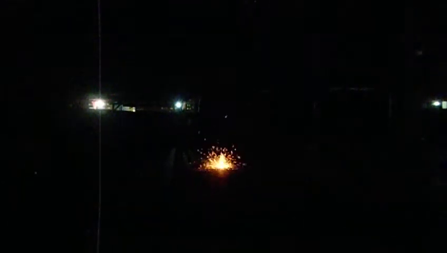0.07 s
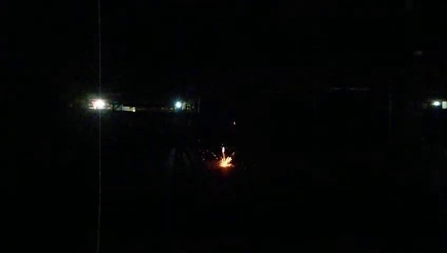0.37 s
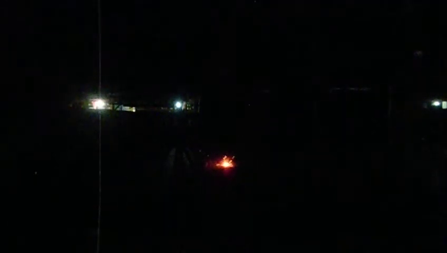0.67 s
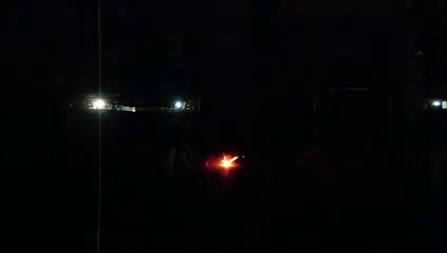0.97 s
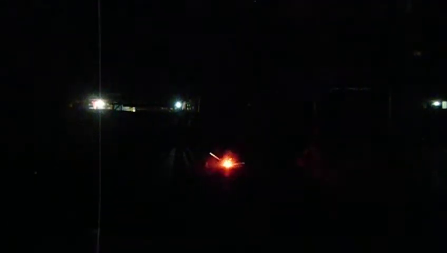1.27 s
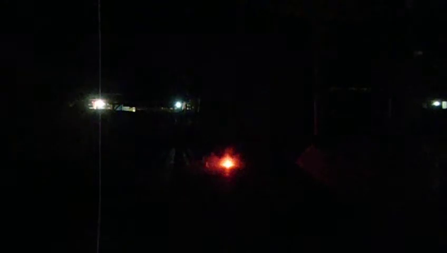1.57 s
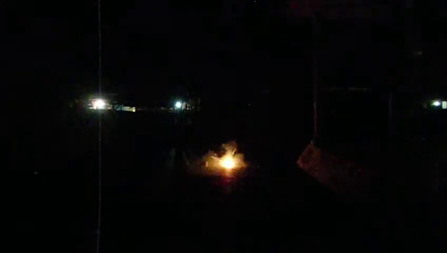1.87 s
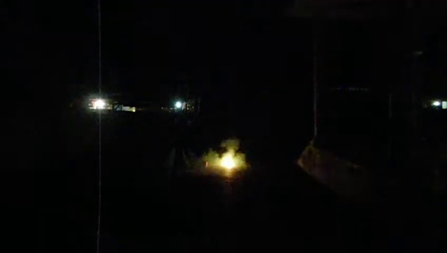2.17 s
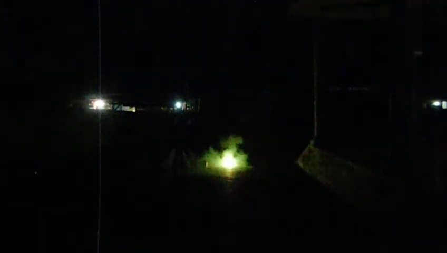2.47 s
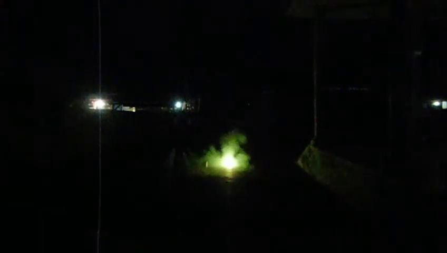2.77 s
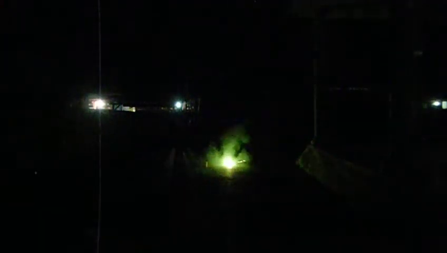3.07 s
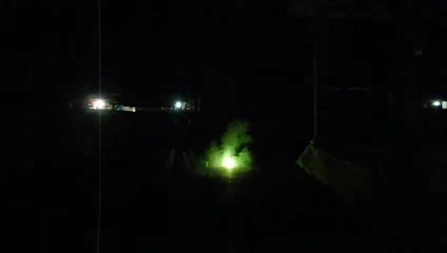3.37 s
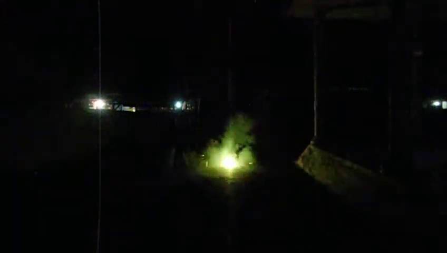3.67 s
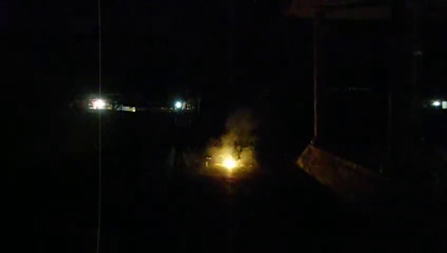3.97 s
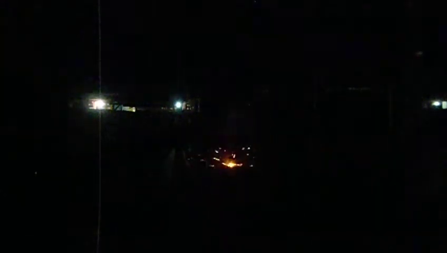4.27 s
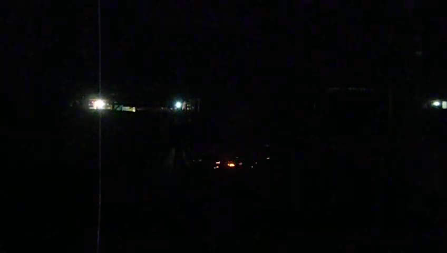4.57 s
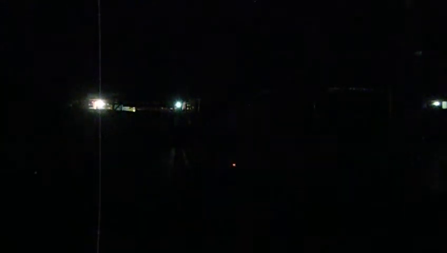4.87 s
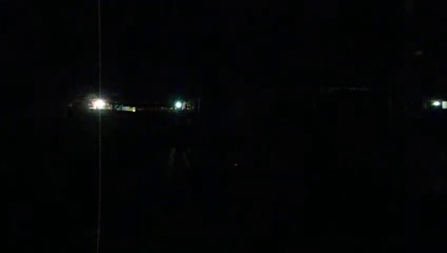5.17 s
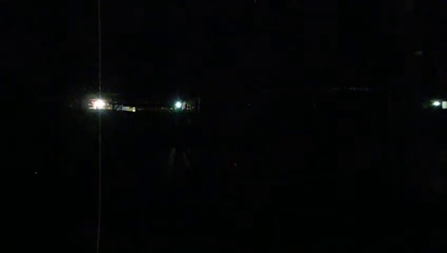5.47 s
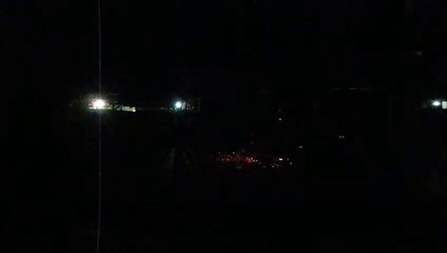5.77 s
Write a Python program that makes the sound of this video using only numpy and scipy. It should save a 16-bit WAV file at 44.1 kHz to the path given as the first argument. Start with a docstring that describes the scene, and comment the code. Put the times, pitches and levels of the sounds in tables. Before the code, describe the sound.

A spinning ground firework hisses, crackles and hums in an echoing yard, dies down, then bursts with a loud, distorted bang.

```python
"""Spinning firework in a yard

A ground firework spins in an echoing yard at night. Its jet of gas hisses and spits, and the
whirling case hums. The charge burns out, the spin slows, and the case bursts with a bang whose
echoes overload the microphone. Behind it lie a distant rumble and one faint, brief tone."""
import sys
import numpy as np
from scipy import signal
from scipy.fft import rfft, irfft, next_fast_len
from scipy.io import wavfile

SR = 44100
rng = np.random.default_rng(int(sys.argv[2]) if len(sys.argv) > 2 else 0)


def dump_mix(stems):
    """Bounce the given channels to the path in sys.argv[1] as a 16-bit WAV at rate SR."""
    frames = np.atleast_2d(stems).T  # one column per channel
    limited = np.clip(frames, -1, 1)  # hard clip at full scale
    pcm = np.round(limited * 32767).astype(np.int16)
    wavfile.write(sys.argv[1], SR, pcm)


N = 256662
TIME = np.arange(N) / SR

# strength of the jet: t/s, hiss level/dB
JET_STRENGTH = [(0, -32.5), (.06, -33.5), (.24, -41.5), (.44, -43), (.79, -38.5), (1.33, -37), (1.62, -36),
                (1.9, -35), (2.6, -33.5), (2.78, -35.5), (3.52, -37.5), (3.77, -36), (4.15, -37),
                (4.38, -46.5), (5.25, -56), (5.5, -58)]
# tone colour of the jet: f/Hz, relative level/dB
JET_SPECTRUM = [(70, -25), (170, -25), (500, -17), (850, -16.5), (1100, -20.5), (2200, -8.5), (2650, -6.5),
                (3250, -1.5), (6100, 0), (7000, -3), (8400, -4.5), (10000, -10.5), (12000, -18),
                (16000, -27)]
# pitches at which the jet rings: f/Hz, width/Hz, relative level/dB
JET_RESONANCES = [(3500, 1400, -20.5), (4740, 430, -15.5), (6050, 290, -19)]
# layers of the charge (priming sparks; red, deep red, amber, green, yellow flame; last sparks; embers):
# start t/s, bright sizzle shift/dB, low rush shift/dB, hum level at full flow/dB
CHARGE_LAYERS = [(0, -4, -11.5, -67.5), (.61, -5, -11, -52), (1.45, -7, -13, -51.5), (1.8, -10, -11, -52),
                 (2.45, -13.5, -9, -53), (3.75, -12, -8.5, -51), (4.3, -7, -10, -54.5),
                 (4.95, -15, -13.5, -65.5)]
# the jet spurts or chokes: t/s, half length/s, hiss change/dB, sizzle change/dB, rush change/dB
JET_SPURTS = [(.04, 0.094, 0, -3, 3.5), (.53, 0.028, 0, 1.5, 3.5), (1.175, 0.027, 2, 0, -3),
              (1.874, 0.023, 2.5, 2.5, -1), (2.664, 0.041, 4.5, -3, -2.5), (4.19, 0.1, -0.7, -3, 4.5),
              (4.26, .025, -6, -2, 5.5), (5.388, .05, 4.5, 2, 5)]
# loudest spits of slag (burnt lumps): t/s, relative level/dB
SLAG_SPITS = [(.0559, -10), (.0902, -11), (.113, -11), (.1974, -18), (1.4804, -24), (2.538, -19),
              (2.5682, -23), (2.647, -20), (2.977, -23), (3.9778, -25), (5.4055, -38)]
# how fast the case spins: t/s, turns per second f/Hz
SPIN_SPEED = [(0, 77.7), (.3, 79), (.75, 85), (1, 86.2), (1.15, 88.4), (1.75, 92), (1.9, 94.1),
              (2.75, 100.8), (2.9, 99.1), (3.1, 100.4), (3.3, 98.7), (3.65, 99.7), (3.9, 96.4),
              (4.05, 98.2), (4.2, 95.3), (5, 82.4), (5.4, 74)]
# resonances that the hum's overtones glide through: f/Hz, relative level/dB
BUZZ_RESONANCES = [(230, 13), (250, 11.5), (272, -2.5), (300, 2), (340, 6.5), (370, -8), (400, 0),
                   (450, -6.5), (535, 4), (575, -2), (700, -4.5), (820, -12), (850, 2), (880, 0),
                   (920, -20), (950, -24), (1120, -2), (2000, -44)]
# tone colour of the bang's echoes: f/Hz, relative level/dB
BANG_SPECTRUM = [(30, -7.5), (100, -8.5), (250, -9), (700, -2.5), (1200, -7.5), (2500, -11), (5000, -15),
                 (8000, -19), (15000, -39.5)]
# sound bouncing off the ground and near walls: delay t/s, relative level/dB
NEAR_ECHOES = [(.00066, -17), (.00907, -10.5), (.0117, -11.5), (.0208, -15)]
# tone colour of the night: f/Hz, relative level/dB
NIGHT_SPECTRUM = [(15, 6.5), (45, -3), (65, 0), (90, 1.5), (120, -3.5), (165, -4), (225, -9.5), (310, -14),
                  (600, -14.5), (2000, -28), (15000, -41)]
# a far tone swells and fades: t/s, level/dB
FAR_TONE_LEVEL = [(5.24, -100), (5.33, -70.5), (5.44, -67), (5.52, -85)]


def jet(angle, hiss_db, sizzle_db, rush_db, rush_gain_db=18, sizzle_gain_db=11, flutter_db=.72):
    """Swirling gas leaves the nozzle; its sound sweeps past twice a turn, once more strongly."""
    rush, treble = split(coloured(JET_SPECTRUM), hz=1654)
    hiss, sizzle = split(treble, hz=8400)
    white = rng.standard_normal(N)
    hiss += sum(from_db(db) * unit_power(resonate(white, hz, width)) for hz, width, db in JET_RESONANCES)
    # large, middling and fine swirls each flicker on their own
    swirls = [(rush, rush_db + rush_gain_db), (hiss, hiss_db), (sizzle, sizzle_db + sizzle_gain_db)]
    gas = sum(noise * from_db(db + .53 * drift(27)) for noise, db in swirls)
    sweep = 1 + .052 * np.cos(angle) + .2 * np.cos(2 * angle)
    return gas * sweep * from_db(flutter_db * drift(40))


def burning(changeover_s=.22, full_flow_db=-35.5, hum_follows=.66):
    """Hiss, sizzle, rush and hum in dB: all follow the jet; the burning layer shifts the last three."""
    hiss_db = over_time(JET_STRENGTH)
    layers = np.array(CHARGE_LAYERS)
    voice_db = layers[0, 1:, None]
    for before, layer in zip(layers, layers[1:]):
        alight = np.clip((TIME - layer[0]) / changeover_s + .5, 0, 1)
        voice_db = voice_db + (layer - before)[1:, None] * alight
    sizzle_db, rush_db, hum_db = voice_db
    hum_db = hum_db + hum_follows * (hiss_db - full_flow_db)
    return hiss_db, hiss_db + sizzle_db, hiss_db + rush_db, hum_db


def spurts():
    """Brief changes in the gas flow raise or lower the hiss, sizzle and rush, in dB."""
    return sum(np.outer(db, bump(TIME, s, half_s)) for s, half_s, *db in JET_SPURTS)


def sparks(hiss_db, grains_per_s=260, spread_db=3.3, grain_db=-12, spit_db=-7, spit_fade_s=.00077):
    """Burning grains crackle in the jet; now and then a lump of slag spits out in a short puff."""
    sizes = from_db(spread_db * np.minimum(rng.exponential(1, N), 4))
    signs = rng.choice([-1, 1], N)
    pops = rng.random(N) < grains_per_s / SR
    crackle = unit_power(band(sizes * signs * pops, 2300, 8900))
    spits = np.zeros(N)
    for s, db in SLAG_SPITS:
        spits[round(s * SR)] += from_db(db + spit_db)
    fades = signal.lfilter([1], [1, -np.exp(-1 / (spit_fade_s * SR))], spits + 1e-18)
    puffs = band(fades * rng.standard_normal(N), 1500, 8100)
    return crackle * from_db(hiss_db + grain_db) + puffs


def hum_levels(hum_db, spin_hz, dip_hz=181, dip_db=-8, full_speed_hz=100, buzz_db_per_hz=.66):
    """The hum's octave sinks as it glides through a dip; higher overtones grow with the spin."""
    octave_db = hum_db + 4.5 + dip_db * bump(2 * spin_hz, dip_hz, width=6.7)
    buzz_db = hum_db - 6.3 + buzz_db_per_hz * (spin_hz - full_speed_hz)
    return octave_db, buzz_db


def hum(angle, spin_hz, hum_db, waver_db=1.44, rocking_ratio=1.36, rocking_db=-13):
    """The circling jet pushes the air once a turn; the case skitters, which roughens the overtones."""
    octave_db, buzz_db = hum_levels(hum_db, spin_hz)
    tones = from_db(hum_db + waver_db * drift(28)) * np.sin(angle + .12 * drift(15))
    tones += from_db(octave_db + waver_db * drift(9.7)) * np.sin(2 * angle + .31 * drift(11))
    for multiple in range(3, 21):
        resonance_db = np.interp(multiple * spin_hz, *np.transpose(BUZZ_RESONANCES))
        level_db = buzz_db + resonance_db + 3.2 * drift(5)
        tones += from_db(level_db) * np.sin(multiple * angle + .7 * drift(7))
    # the case rocks, adding a weak tone between the lowest note and its octave
    rocking = from_db(3.5 * drift(5)) * np.sin(rocking_ratio * angle + .9 * drift(6))
    return np.sqrt(2) * (tones + from_db(octave_db + rocking_db) * rocking)


def bang(start_s=5.5391, boom_db=20, boom_fade_s=.011, echo_db=16.5, fall_db_per_s=77, far_delay_s=.175):
    """The case bursts: a heavy thump of air, then dense echoes from the walls that die away."""
    age = np.maximum(TIME - start_s, 0)
    # a brighter cluster of echoes comes back from far walls
    crack_db = -5 + 11.5 * bump(age, far_delay_s, width=.066)
    body, crack = split(coloured(BANG_SPECTRUM), hz=5300)
    echoes = (body + crack * from_db(crack_db)) * from_db(echo_db - fall_db_per_s * age)
    low_noise = unit_power(band(rng.standard_normal(N), 50, 410))
    boom = low_noise * from_db(boom_db) * np.exp(-age / boom_fade_s)
    onset = 1 - np.exp(-age / .0008)
    return (echoes + boom) * onset


def overload(x, limit=.72, stuck_level=.22, squeal=.53, squeal_hz=14800, width_hz=1500, recover_s=3e-5):
    """Past its limit, the microphone's converter sticks at a lower level and squeals very high."""
    decay = np.exp(-1 / (recover_s * SR))
    stuck = signal.lfilter([1 - decay], [1, -decay], 1.0 * (np.abs(x) > limit))
    # the squeal slips at random, which smears it into a sizzle
    slips = np.sqrt(2 * np.pi * width_hz / SR) * rng.standard_normal(N)
    phase = np.cumsum(2 * np.pi * squeal_hz / SR + slips)
    stuck_sound = stuck_level * np.sign(x) + squeal * np.sin(phase)
    return (1 - stuck) * np.clip(x, -limit, limit) + stuck * stuck_sound


def add_near_echoes(x):
    """The ground and near walls send back dulled copies, which colour the hiss."""
    dull = signal.sosfilt(signal.butter(1, 6500, fs=SR, output="sos"), x)
    return x + sum(from_db(db) * np.interp(TIME - s, TIME, dull, left=0) for s, db in NEAR_ECHOES)


def yard_echoes(x, paths=10, fade_s=1.4):
    """Sound bounces to and fro between walls along paths of random length, losing 60 dB in fade_s."""
    echoes = np.zeros(N)
    for path, lag in enumerate((rng.uniform(.018, .075, paths) * SR).astype(int)):
        bouncing = x.copy()
        gain = from_db(-60 * lag / SR / fade_s)
        for i in range(lag, N, lag):
            bouncing[i:i + lag] += gain * bouncing[i - lag:i][:N - i]
        echoes += (bouncing - x) * (-1) ** path
    return echoes / np.sqrt(paths)


def night(rumble_db=-59.5, tone_hz=463):
    """A distant rumble and one faint, wavering tone."""
    tone = np.sqrt(2) * np.sin(2 * np.pi * tone_hz * TIME + .64 * drift(12))
    return from_db(rumble_db) * coloured(NIGHT_SPECTRUM) + from_db(over_time(FAR_TONE_LEVEL)) * tone


def from_db(db):
    """Turn decibels into a number to multiply by."""
    return 10 ** (np.asarray(db) / 20)


def unit_power(x):
    """Scale a signal to an average power of 1."""
    return x / np.sqrt(np.mean(x ** 2) + 1e-20)


def over_time(points):
    """Join (time, value) points with straight lines, sample by sample."""
    return np.interp(TIME, *np.transpose(points))


def bump(x, centre, width):
    """A bell-shaped curve of height 1."""
    return np.exp(-((x - centre) / width) ** 2)


def drift(rate_hz, step=40, warm_up=2000):
    """A smooth random wander of typical size 1; a higher rate makes it quicker."""
    r = np.exp(-2 * np.pi * rate_hz * step / SR)
    noise = rng.standard_normal(N // step + warm_up + 2)
    slow = signal.lfilter([1], [1, -2 * r, r * r], noise)[warm_up:]
    return np.interp(np.arange(N) / step, np.arange(len(slow)), unit_power(slow))


def band(x, low_hz, high_hz):
    """Keep mainly the sound between two frequencies."""
    return signal.sosfilt(signal.butter(2, [low_hz, high_hz], "band", fs=SR, output="sos"), x)


def resonate(x, hz, width_hz):
    """Let sound near one pitch through and weaken the rest."""
    r = np.exp(-np.pi * width_hz / SR)
    feedback = [1, -2 * r * np.cos(2 * np.pi * hz / SR), r * r]
    return signal.lfilter(np.array([1, 0, -1]) * (1 - r * r) / 2, feedback, x)


def coloured(spectrum):
    """Noise of power 1 with the given tone colour."""
    hz, db = np.transpose(spectrum)
    size = next_fast_len(N)
    bins_hz = np.maximum(np.fft.rfftfreq(size, 1 / SR), 1)
    gain = from_db(np.interp(np.log(bins_hz), np.log(hz), db))
    return unit_power(irfft(rfft(rng.standard_normal(size)) * gain, size)[:N])


def split(x, hz):
    """Gently divide a sound into the parts below and above a frequency."""
    size = next_fast_len(N)
    bins_hz = np.fft.rfftfreq(size, 1 / SR)
    below = irfft(rfft(x, size) / (1 + (bins_hz / hz) ** 4), size)[:N]
    return below, x - below


def scene():
    """The firework spins straight ahead, so both channels are alike."""
    *gas_db, hum_db = burning()
    hiss_db, sizzle_db, rush_db = np.array(gas_db) + spurts()
    sizzle_db = sizzle_db + .46 * drift(4.7)
    spin_hz = over_time(SPIN_SPEED) * (1 + .003 * drift(6))
    angle = 2 * np.pi * np.cumsum(spin_hz) / SR
    fizz = add_near_echoes(jet(angle, hiss_db, sizzle_db, rush_db) + sparks(hiss_db))
    whirl = hum(angle, spin_hz, hum_db)
    mono = from_db(-1) * fizz + from_db(-11) * yard_echoes(fizz) + whirl + bang() + night()
    return np.array([mono, mono])


def record(dry):
    """The converter overloads and sits a little off zero; peaks and the highest treble are cut."""
    offset, ceiling, cutoff_hz = .006, .8, 15750
    gentle_cut = signal.butter(4, 17500, fs=SR, output="sos")
    steep_cut = signal.ellip(12, .1, 80, cutoff_hz, fs=SR, output="sos")
    converted = signal.sosfilt(gentle_cut, overload(dry))
    return signal.sosfiltfilt(steep_cut, np.clip(converted, -ceiling, ceiling)) + offset


dry = scene()
out = record(dry)
dump_mix(out)
```